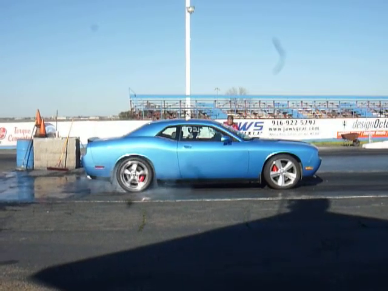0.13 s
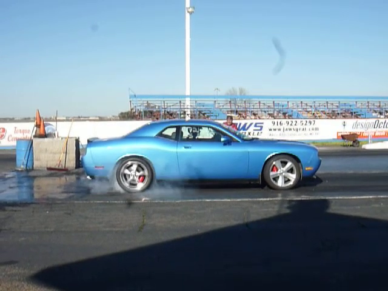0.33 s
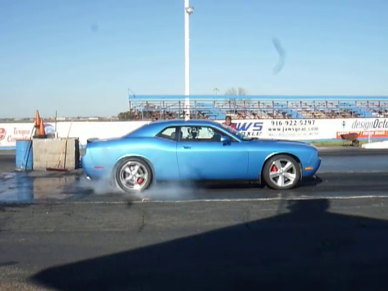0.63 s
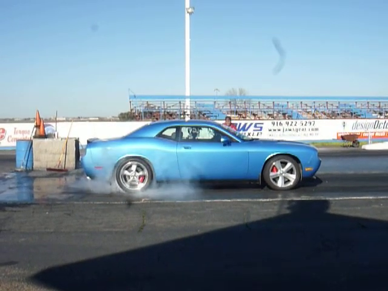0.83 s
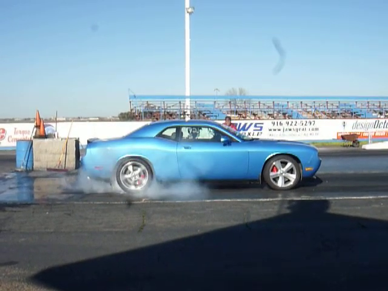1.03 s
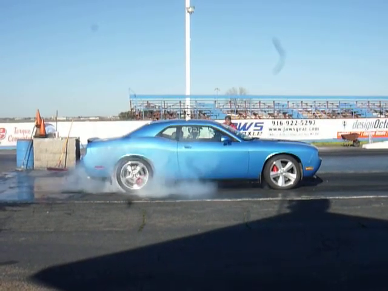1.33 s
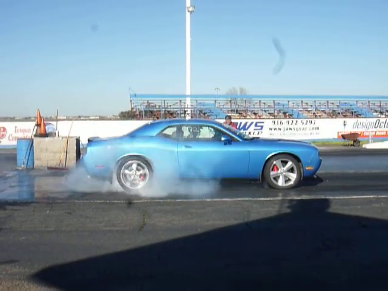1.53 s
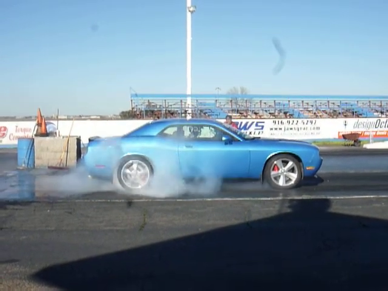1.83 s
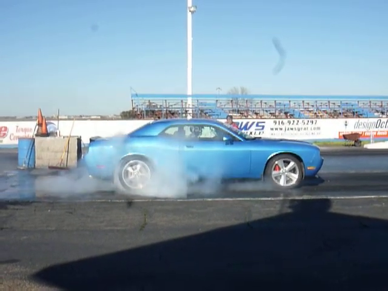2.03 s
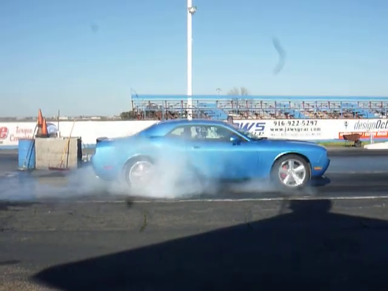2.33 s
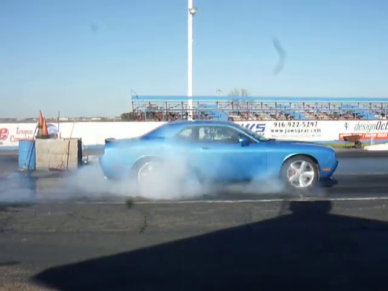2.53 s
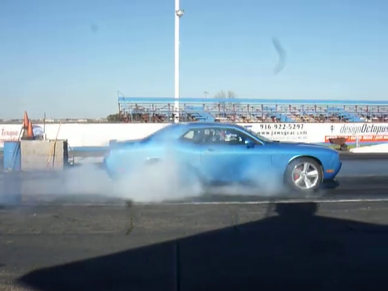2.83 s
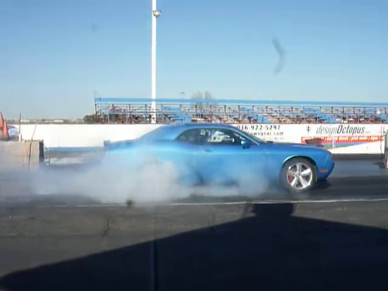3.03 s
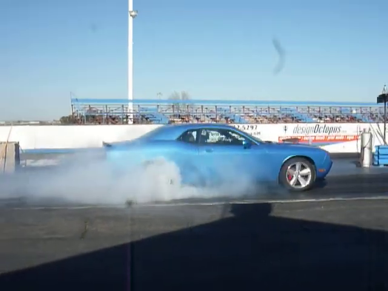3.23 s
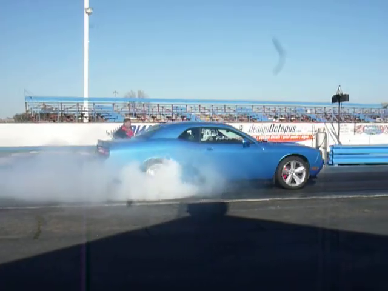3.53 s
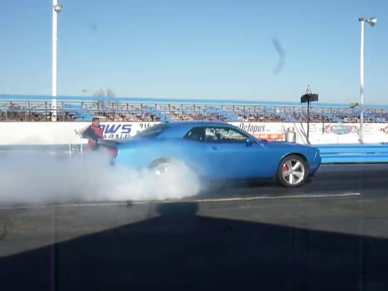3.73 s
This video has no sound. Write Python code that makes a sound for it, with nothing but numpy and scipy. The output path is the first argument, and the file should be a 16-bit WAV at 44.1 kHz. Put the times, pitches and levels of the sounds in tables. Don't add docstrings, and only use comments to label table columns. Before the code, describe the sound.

A powerful V8 roars from the start, raspy and dense, over the broad rush of spinning tyres, its pitch easing down slightly until 1.4 s. Revs climb from 2 to 2.45 s, sag and quieten at 2.5, then two sharp exhaust pops near 2.67 bring back full roar. Pitch drops around 3 s and holds, with a tiny click at 3.4. Open strip, faint echoes, dull small microphone.

```python
import sys
import numpy as np
from scipy import signal
from scipy.io import wavfile
from scipy.ndimage import uniform_filter1d

SR = 44100
rng = np.random.default_rng(int(sys.argv[2]) if len(sys.argv) > 2 else 0)


def generate_wav(sig):
    pcm = np.round(np.clip(np.atleast_2d(sig).T, -1, 1) * 32767).astype(np.int16)
    wavfile.write(sys.argv[1], SR, pcm)


def voltage_ratio(decibels):
    exponent = np.asarray(decibels, float) / 20
    return 10 ** exponent


N = 171990
OPEN_DB = -18.5


def in_time(rows):
    seconds, *columns = np.transpose(rows)
    return [np.interp(np.arange(N) / SR, seconds, column) for column in columns]


def rms_one(x):
    return x / np.sqrt(np.mean(x ** 2) + 1e-20)


def drift(rate_hz):
    r = np.exp(-80 * np.pi * rate_hz / SR)
    noise = rng.standard_normal(N // 40 + 2002)
    slow = signal.lfilter([1], [1, -2 * r, r * r], noise)[2000:]
    return np.interp(np.arange(N) / 40, np.arange(len(slow)), rms_one(slow - slow.mean()))


def ramp(x, low, high):
    return np.clip((x - low) / (high - low), 0, 1)


# (delay [s], level [dB])
ECHOES = [
    (0.032, -22),
    (0.073, -21),
    (0.119, -25),
]


def echoes(x):
    dull = signal.sosfilt(signal.butter(2, 1700, fs=SR, output="sos"), x)
    out = 0
    for delay_s, db in ECHOES:
        earlier = dull[:int(delay_s * SR)][::-1]
        out = out + voltage_ratio(db) * np.concatenate([earlier, dull])[:N]
    return out


TYRE_DB, TYRE_FOLLOWS = -34.5, 0.51
# (frequency [Hz], density [dB per Hz])
TYRES = [(35, -52), (60, -20), (255, -10.5), (380, -14.5), (503, -7.5), (694, -21.5), (1010, -3),
         (1790, -18), (3410, -20.5), (4300, -46.5), (5590, -79.5), (9460, -120)]


def tyres(throttle_db):
    edges = 60 * 2 ** np.arange(0, 6.4, 1 / 3)
    white = rng.standard_normal((2, N))
    hz, db = np.transpose(TYRES)
    out = 0
    for k, (low, high) in enumerate(zip(edges, edges[1:])):
        band = signal.sosfilt(signal.butter(2, [low, high], "band", fs=SR, output="sos"), white[k % 2])
        band_db = np.interp(np.log(low * high) / 2, np.log(hz), db)
        out = out + band * voltage_ratio(band_db + 2.2 * drift(2.2))
    return voltage_ratio(TYRE_DB + TYRE_FOLLOWS * (throttle_db - OPEN_DB)) * rms_one(out)


RASP_DB, RASP_FOLLOWS = -42, 0.2
RASP_GATE, RASP_PULSE_DB = 0.65, 23
CYLINDER_DB = [0, -10.5, -0.5, -1.5, -4.5, 2, -1, -7.5]
# (frequency [Hz], width [Hz], level [dB])
RASP = [(1502, 61, -3), (1953, 100, 4), (2330, 450, -6.5), (2746, 160, 2.5), (3340, 340, -3.5)]


def rasp(throttle_db, cycle):
    gate = 1 + RASP_GATE * (np.sin(3 * cycle) + 0.25 * np.sin(8 * cycle) + 0.4 * np.sin(cycle))
    firing = (cycle * 4 / np.pi).astype(int)
    pulse_db = RASP_PULSE_DB + np.array(CYLINDER_DB)[firing % 8] + rng.normal(0, 2.5, N)
    pulses = np.diff(firing, prepend=0) * voltage_ratio(pulse_db)
    hiss = gate * rng.standard_normal(N) + pulses
    out = 0
    for k, (hz, wide, db) in enumerate(RASP):
        r = np.exp(-np.pi * wide / SR)
        poles = [1, -2 * r * np.cos(2 * np.pi * hz / SR), r * r]
        ring = signal.lfilter([1 - r * r, 0, r * r - 1], poles, hiss)
        out = out + (-1) ** k * voltage_ratio(db) * ring
    return voltage_ratio(RASP_DB + RASP_FOLLOWS * (throttle_db - OPEN_DB)) * rms_one(out)


# frequency [Hz], decay by 60 dB [s], level [dB]
POP_HZ, POP_T60_S, POP_DB = [85, 327.5, 890], [0.048, 0.045, 0.018], [-15, -1.5, 3]
# (time [s], level [dB])
POPS = [
    (2.505, -24),
    (2.662, -18),
    (2.686, -15),
]


def pops():
    clicks = np.zeros(N)
    for s, db in POPS:
        clicks[int(s * SR)] = voltage_ratio(db)
    out = 0
    for hz, t60, db in zip(POP_HZ, POP_T60_S, POP_DB):
        r, w = voltage_ratio(-60 / (t60 * SR)), 2 * np.pi * hz / SR
        poles = [1, -2 * r * np.cos(w), r * r]
        out = out + signal.lfilter([0, voltage_ratio(db) * np.sin(w)], poles, clicks + 1e-18)
    return out


# (frequency [Hz], width [Hz], gain [dB])
PIPES = [(153.1, 85, 14), (340, 89, 6), (775, 64, -12), (921.2, 35, 9), (1070, 280, 5.5), (1481, 200, 7)]


def pipe_db(hz):
    return sum(db / (1 + (2 * (hz - mid) / wide) ** 2) for mid, wide, db in PIPES)


EXHAUST_DB, OVERRUN_FOLLOWS = 1, 0.4
ROLL_FROM_S, ROLL_DONE_S = 1.9, 3.05
WANDER_DB, ROLL_DB, STRAIN_DB = 0.6, 0.7, 6
WANDER_RAD, SPREAD_RAD = 0.15, 1.0
SWEEP_RAD = 0.06
ROUGH_SHARE, LIFT_ROUGH = 0.03, 0.05
STRAIN_ROUGH, STRAIN_TOP = 0.007, 35
STARTING = [-25.5, -21.5, -7.5, -16.5, -16, -6.5, -18.5, -8, -7, -5, -9.5, -8.5, -5, -6, -14.5, -13, -17,
            -8.5, -4, -9, 2, -13, -7, -7, -10.5, -15.5, -11, -23, -16, -32, -19, -17, -19.0, -29.5, -16,
            -31, -37.5, -39.5, -32, -28]
SQUATTING = [-34.5, -19.5, -10.5, -15, -25, -6.0, -12, -8, -18.5, -7.5, -13.5, -7, -5, -14, -19, -11, -18,
             -23.5, -4, -20.5, 3.5, -8.5, -8, -4, -13.0, -14, -9, -10.5, -20, -21.5, -24, -19.5, -24.5, -27,
             -23.5, -21, -18, -31, -38, -29.5]
STANDING = [-18, -20, -15, -14.0, -15, -3.0, -10.5, -5.5, -18, -12.5, -9, -8, -18, -11.5, -15, -25.5, -22,
            -17.5, -11.5, -12, -0.5, -9, -14, 0, -17.5, -13.5, -10.5, -12.5, -13, -24, -16, -19.5, -26.5,
            -19.5, -26.5, -22, -26.5, -26.5, -32.5, -27.5]
RISING = [-33, -23.5, -5, -11.0, -15.5, -5.5, -26.5, -4, -4.5, -11, -14, -9, -7.5, -4, -15, -8, -14, -10.5,
          0.5, -7.5, -0.5, -12.5, -16.5, -9, -18, -15.5, -16, -17.5, -20, -14, -19.5, -16, -21, -34, -26.5,
          -32, -39, -33, -31, -33]
REVVED = [-30, -22, -2.5, -11, -19.5, -5.5, -16.5, -7, -4, -13.5, -15, -9.5, -5, -18, -13, -9, -9.5, 0,
          -13.5, -12.5, -7.5, -4, -19.5, -16.5, -23, -17.5, -25.5, -25, -13.5, -25.5, -27.5, -34.5, -37.5,
          -41.5, -28.5, -31.5, -32, -44.5, -30.5, -35.5]
LIFTED = [-47.5, -32, -17.0, -19, -16.0, -1.5, -12.5, -17, -15.0, -12, -23, -12.0, -15.5, -22.0, -17.5,
          -20.0, -19.5, -13.0, -18, -14.5, -17.0, -15.5, -25, -25, -34, -27, -27.5, -31, -24, -33, -23, -30,
          -36.0, -32.0, -31.5, -29.5, -33.5, -31.0, -35.5, -28.5]
REFIRED = [-33.0, -25, -2.0, -14.5, -16, -8.5, -17.5, -12.0, -3.5, -14.5, -12.5, -8.0, -3.0, -14.0, -11.5,
           -2.0, -8, 0, -5, -14.5, -19.5, -5.5, -19, -13.5, -21.5, -20.5, -18, -14.0, -30, -29.5, -26, -27,
           -35, -25, -29.5, -27.0, -27.5, -30.5, -28.0, -30.5]
ROLLED = [-25.5, -19.5, -6.5, -18, -6, -15.0, -13.5, -8, -10, -8.5, -10.5, -15.5, -9.0, -7.5, -16.5, -12,
          -25.5, -18.5, -2, -9, -3.5, -15.0, -12, 0, -14.5, -16, -14.5, -18.5, -13.5, -31.5, -16, -23,
          -23.5, -22.5, -22, -25.5, -34.5, -39, -42.5, -44]
LEAVING = [-35, -18.5, -10.5, -18.0, -7.5, -13.5, -17, -0.5, -12.5, -8.5, -16.5, -13.0, -12.0, -12.5, -15,
           -9, -15.0, -12, -8.0, -16.0, 3, -10.0, -12, -4.0, -17.5, -12, -14.5, -16.5, -15, -23.5, -19, -25,
           -21.5, -24, -20, -20.0, -33.5, -35, -37, -35.5]
# (time [s], colour [dB per order])
STAGES = [(.12, STARTING), (.52, SQUATTING), (1.0, STANDING), (1.96, STANDING), (2.16, RISING),
          (2.36, REVVED), (2.48, REVVED), (2.53, LIFTED), (2.655, LIFTED), (2.68, REFIRED), (2.87, REFIRED),
          (3.03, ROLLED), (3.22, ROLLED), (3.45, LEAVING)]


def exhaust(rate, throttle_db, drone_db, cycle):
    t = np.arange(N) / SR
    rolled = ramp(t, ROLL_FROM_S, ROLL_DONE_S)
    lift_db = OVERRUN_FOLLOWS * np.minimum(throttle_db - OPEN_DB - 0.5, 0)
    strain = uniform_filter1d(abs(np.gradient(rate)) * SR, size=2000)
    rough = ROUGH_SHARE + STRAIN_ROUGH * np.minimum(strain, STRAIN_TOP) - LIFT_ROUGH * lift_db
    when = np.array([s for s, _ in STAGES])
    colours = np.transpose([colour for _, colour in STAGES])
    orders, power = 0, 0
    for k, heard_db in enumerate(colours, 1):
        source_db = np.interp(t, when, heard_db - pipe_db(k * np.interp(when, t, rate)))
        swell_db = (WANDER_DB + ROLL_DB * rolled) * drift(2.4) + STRAIN_DB * rough * drift(9.0)
        gain = voltage_ratio(source_db + pipe_db(k * rate) + swell_db)
        start = rng.normal(np.pi / 2, SPREAD_RAD) - SWEEP_RAD * k * k
        wander = WANDER_RAD * np.sqrt(k / 10) * drift(3.0) + rough * k / 10 * drift(40)
        tone = np.sqrt(2) * np.sin(k * cycle + start + wander)
        if k == 6:
            drone = voltage_ratio(drone_db) * tone
        else:
            orders = orders + gain * tone
            power = power + gain ** 2
    return voltage_ratio(EXHAUST_DB + throttle_db + lift_db) * orders / np.sqrt(power) + drone


# (time [s], cycle rate [Hz], throttle as exhaust level [dB], sixth-order drone [dB])
ENGINE = [(0.0, 46.17, -19.5, -32.5), (0.6, 43.25, -19.5, -30), (1.4, 42.18, -19.5, -27.5),
          (1.97, 43, -20, -30), (2.44, 54.69, -20, -30.5), (2.49, 54.02, -23, -30),
          (2.52, 53.92, -24.5, -30.5), (2.65, 50.96, -26.5, -23.5), (2.68, 51.83, -19.5, -27.5),
          (2.86, 53.7, -19.5, -45), (2.9, 52.17, -19, -35.5), (3.005, 43.62, -20, -35.5),
          (3.06, 45.32, -19.5, -46), (3.11, 44.58, -19.5, -38.5), (3.28, 44.93, -19.5, -40),
          (3.36, 44.04, -19.5, -39), (3.57, 43.98, -20, -36), (3.9, 41.02, -20.5, -44.5)]


def scene():
    rate, throttle_db, drone_db = in_time(ENGINE)
    cycle = 2 * np.pi * np.cumsum(rate) / SR
    pipes = exhaust(rate, throttle_db, drone_db, cycle) + pops()
    mix = pipes + echoes(pipes) + tyres(throttle_db) + rasp(throttle_db, cycle)
    return mix[None]


def low_pass(x):
    return signal.sosfilt(signal.butter(12, 15800, fs=SR, output="sos"), x)


MIC_LOW_HZ, MIC_TOP_HZ, OFFSET = 90.5, 3470, -0.0406
GLITCH_S, GLITCH_STEP = 3.4233, -0.22


def record(dry):
    x = signal.sosfilt(signal.butter(2, MIC_LOW_HZ, "high", fs=SR, output="sos"), dry)
    x = signal.sosfilt(signal.butter(6, MIC_TOP_HZ, fs=SR, output="sos"), x)
    x = signal.sosfilt(signal.cheby2(12, 50, 4850, fs=SR, output="sos"), x)
    at = int(GLITCH_S * SR) - 30
    at += np.argmax(x[0, at:at + 60])
    lags = np.arange(60, 500)
    jump = x[0, at - lags] - x[0, at - 1]
    lag = lags[np.argmin(abs(jump - GLITCH_STEP))]
    x = np.concatenate([x[:, :at], x[:, at - lag:N - lag]], axis=1)
    return low_pass(x + OFFSET)


dry = scene()
out = record(dry)
generate_wav(out)
```